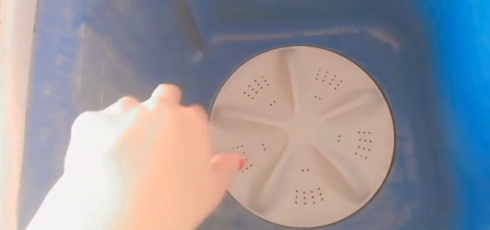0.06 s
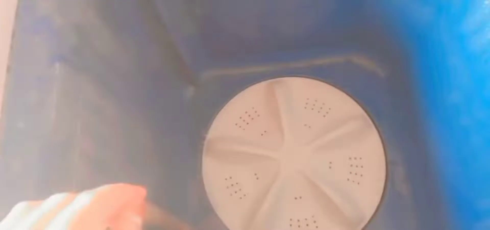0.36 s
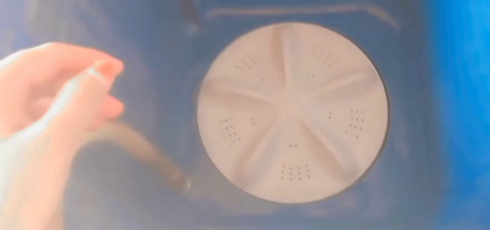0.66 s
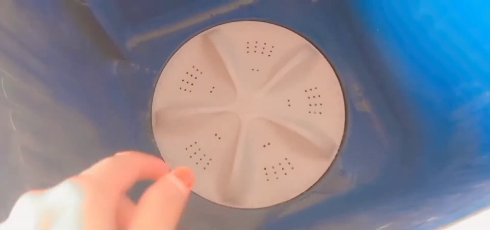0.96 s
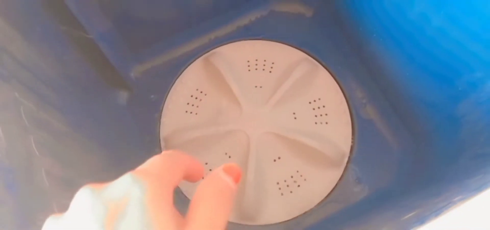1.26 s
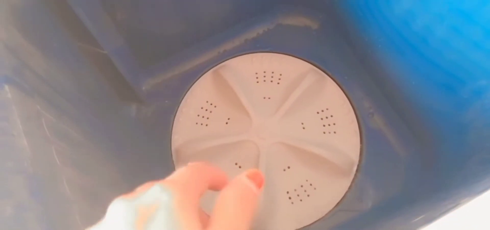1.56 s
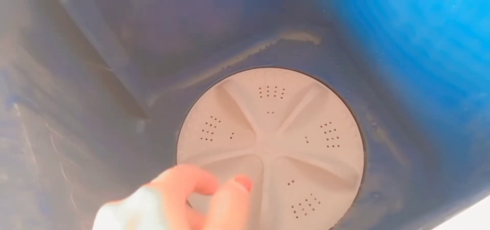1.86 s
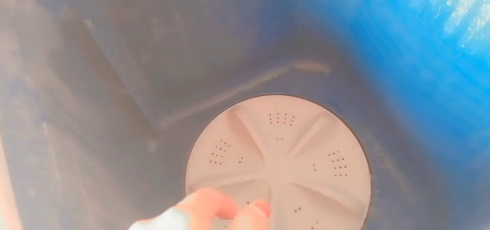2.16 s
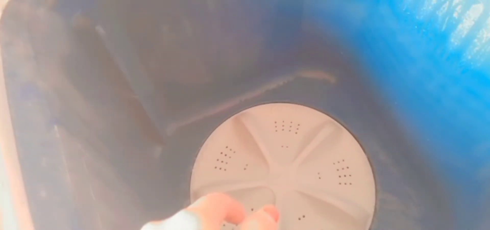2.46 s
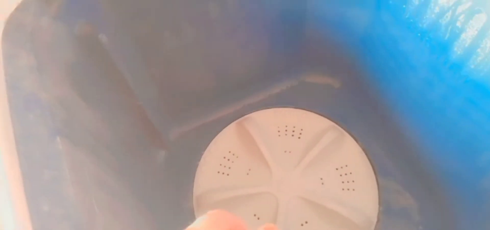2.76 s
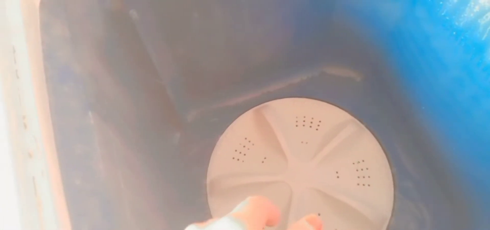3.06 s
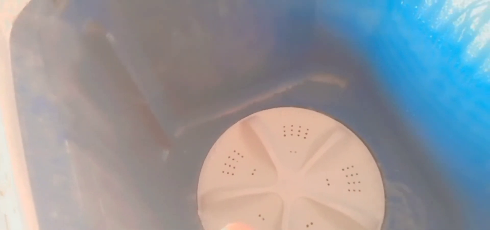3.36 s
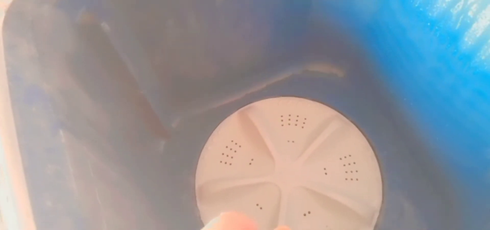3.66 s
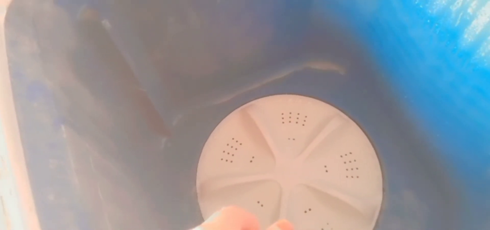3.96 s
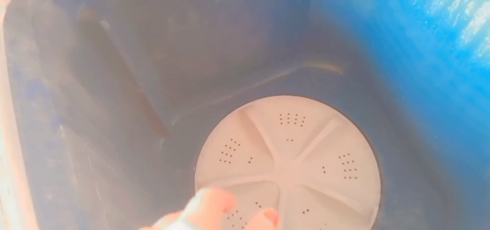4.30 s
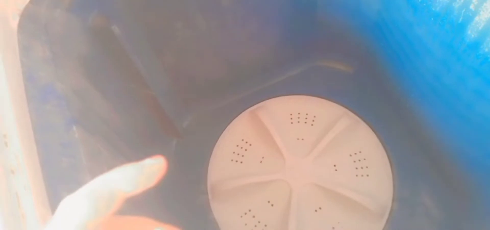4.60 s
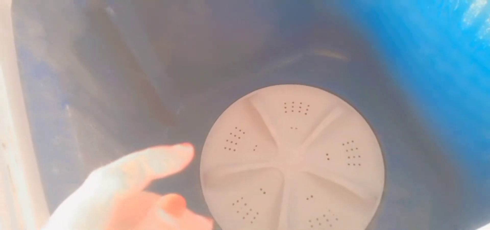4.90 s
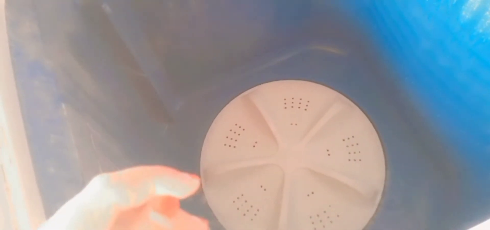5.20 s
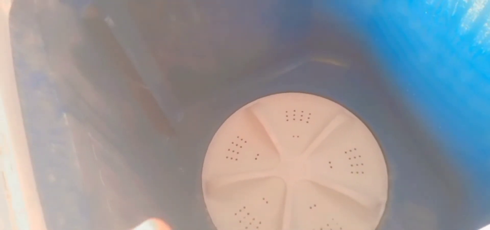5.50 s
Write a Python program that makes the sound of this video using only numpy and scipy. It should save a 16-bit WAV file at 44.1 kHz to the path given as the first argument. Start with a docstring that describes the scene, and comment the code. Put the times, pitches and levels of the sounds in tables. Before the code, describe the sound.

Water from a hose sputters, fizzes and splashes into an empty plastic washing machine tub over a low, hollow hum.

```python
"""Water sputters, fizzes and splashes over a low, hollow hum, with one knock about a second in.
A hose runs into the empty plastic tub of a washing machine, outdoors, heard from just above the rim.
The stream spatters on the bottom and traps ringing bubbles, larger ones as a puddle forms.
Its push keeps the air in the tub humming. The knock is the hose bumping the wall."""
import sys
import numpy as np
from scipy import signal
from scipy.fft import rfft, irfft
from scipy.io import wavfile
from scipy.ndimage import uniform_filter1d

SR = 44100
rng = np.random.default_rng(int(sys.argv[2]) if len(sys.argv) > 2 else 0)


def unload_audio(sound):
    """Save the sound as a 16-bit wav file, at the path given as the first command line argument."""
    columns = np.transpose(np.atleast_2d(sound))
    # keep every value between -1 and 1, then stretch to whole-number steps
    steps = np.round(np.clip(columns, -1, 1) * 32767)
    wavfile.write(sys.argv[1], SR, steps.astype(np.int16))


N = 244314
TIME = np.arange(N) / SR

# The tone of drops on plastic, of splashing and of fine spray. Each row: frequency in Hz, level in dB.
SPATTER_TONE = [(100, -71), (700, -77), (1500, -51), (2500, -7.5), (4000, -5.5), (5200, -17.5),
                (6500, -3.5), (7400, 4), (8100, -1.5), (8700, 8), (9500, -7.5), (12000, -29),
                (13700, -24.5), (16000, -19)]
SPLASH_TONE = [(450, -34), (750, -6), (1150, -9), (1600, -10.5), (2800, -2.5), (4300, 14), (5200, -2),
               (7400, 6.5), (16000, -37.5)]
SPRAY_TONE = [(1000, -59), (6000, -1.5), (12000, -1.5), (15800, -6.5)]
# The notes at which the tub's air and its plastic shell ring.
# Each row: pitch in Hz, level in dB, seconds to fade by 60 dB.
AIR_NOTES = [(281.3, 9, 0.85), (562, -9.5, 0.18)]
SHELL_NOTES = [(188.3, -0.5, 0.22), (297.7, 5, 0.29), (543, 5.5, 0.042), (788, 11, 0.017),
               (884, 7.5, 0.056), (961, 7.5, 0.091)]


def undb(db):
    """Turn decibels into a factor to multiply by."""
    return 10 ** (np.asarray(db) / 20)


def curve(rows):
    """Join rows of (seconds, value) with straight lines."""
    return np.interp(TIME, *np.transpose(rows))


def unit(x):
    """Scale a sound to an average power of 1."""
    return x / np.sqrt(np.mean(x ** 2))


def even(x, span_s):
    """Hold the power near 1 over each span: a steady supply of water, uneven only in its detail."""
    size = max(int(span_s * SR / 2), 2)
    power = uniform_filter1d(uniform_filter1d(x ** 2, size), size)
    return x / np.sqrt(np.abs(power) + 1e-4 * np.mean(x ** 2))


def fade(t, t60):
    """Die away by 60 dB each time t grows by t60."""
    return np.exp(-np.log(1000) * t / t60)


def flicker(per_s):
    """Wander at random around zero, heading for a new value per_s times a second."""
    targets = rng.standard_normal(1000)
    return unit(np.interp(TIME * per_s, np.arange(len(targets)), targets))


def add(out, s, sound):
    """Mix a short sound in, starting at s seconds."""
    start = int(np.clip(s * SR, 0, N - 1))
    out[start:start + len(sound)] += sound[:N - start]


def colour(x, tone, size=4096):
    """Filter a sound so that it takes on the tone given by rows of (Hz, dB)."""
    hz, db = np.transpose(tone)
    grid_hz = np.maximum(np.arange(size // 2 + 1) * SR / size, 1)
    gains = undb(np.interp(np.log(grid_hz), np.log(hz), db))
    # these steps make the filter ring only after a hit, never before it
    cepstrum = irfft(np.log(gains))
    cepstrum[1:size // 2] *= 2
    cepstrum[size // 2 + 1:] = 0
    response = irfft(np.exp(rfft(cepstrum)))
    return signal.fftconvolve(x, response / np.linalg.norm(response))[:N]


def resonate(x, notes):
    """A push makes an object ring at its own fading notes."""
    t = TIME[:SR // 2]
    ring = sum(undb(db) * fade(t, t60) * np.cos(2 * np.pi * hz * t) for hz, db, t60 in notes)
    return signal.fftconvolve(x, ring)[:N]


def impacts(per_s, scatter_db):
    """Clicks at random times, many small and a few large."""
    size = undb(scatter_db * np.minimum(rng.exponential(size=N), 5))
    return (rng.random(N) < per_s / SR) * size * np.sign(rng.standard_normal(N))


def ping(hz, cycles, rise):
    """A short note swells quickly, then climbs in pitch as it fades."""
    age = np.arange(int(cycles / hz * SR)) * hz / SR  # counted in cycles
    ring = np.sin(2 * np.pi * (age + rise * age ** 2 / (2 * cycles)))
    swell = 1 - np.exp(-(age / 2) ** 2)
    return ring * fade(age, cycles) * swell


def swarm(count, centre_hz, octaves, cycles, scatter_db, rise):
    """Many pings at random times, scattered around a pitch that may move."""
    out, centre = np.zeros(N), np.broadcast_to(centre_hz, N)
    for when, size, strength, life in rng.random((count, 4)):
        hz = centre[int(when * N)] * 2 ** (octaves * np.arcsin(2 * size - 1))
        gain = undb(-scatter_db * np.log(max(strength, .01)))
        add(out, when * N / SR, gain * ping(hz, cycles * (.5 + life), rise))
    return out


def walls(x, echo_db, t60=.06, pieces=30):
    """Close plastic walls throw the sound back; the echoes change as the stream wanders."""
    t = TIME[:SR // 8]
    hop = N // pieces
    out = x.copy()
    for start in range(0, N - hop, hop):
        piece = x[start:start + 2 * hop]
        echoes = rng.standard_normal(len(t)) * (rng.random(len(t)) < .08)
        echoes *= fade(t, t60) * (t > .0015)
        echoes /= np.linalg.norm(echoes)
        window = np.sin(np.pi * np.arange(len(piece)) / (2 * hop))
        add(out, start / SR, undb(echo_db) * signal.fftconvolve(piece * window, echoes))
    return out


def hollow(x, sharpness=24, spread_s=0.9, gain_db=0.41):
    """The tub lifts a few narrow bands of the splashing; which ones depends on where the stream lands."""
    # Each row: frequency in Hz, boost in dB, time in seconds when it is strongest.
    bands = [(2970, 3.5, 1.1), (4070, 8.5, 2.52), (3180, 3, 4.7), (5800, 9.5, 3.2), (7580, 5.5, 3.5),
             (9720, 3, 3.5), (13800, 5, 4.1), (2830, 4, 5.8)]
    out = x.copy()
    for hz, db, s in bands:
        nearness = np.exp(-((TIME - s) / spread_s) ** 2)
        band = signal.lfilter(*signal.iirpeak(hz, sharpness, fs=SR), x)
        out += (undb(db) - 1) * nearness * band
    return undb(gain_db) * out


def outdoors(level_db=-68):
    """The open air makes a faint, even hiss."""
    # The tone of the hiss. Each row: frequency in Hz, level in dB.
    air_tone = [(25, 5.5), (90, 0), (400, 1), (1000, -5), (3000, 5.5), (9000, -3), (16000, -9)]
    return undb(level_db) * unit(colour(rng.standard_normal(N), air_tone))


def hum(shell_db=-19):
    """The stream's soft, uneven push keeps the air in the tub sounding, and the shell faintly with it."""
    # How strongly the push makes the tub hum. Each row: time in seconds, level in dB.
    hum_levels = [(0, -57.5), (.5, -59.5), (.92, -64.5), (1.25, -62.5), (1.76, -59.5), (1.96, -72),
                  (2.11, -60), (2.3, -71.5), (2.52, -61.5), (2.61, -71.5), (2.7, -62), (2.8, -69.5),
                  (3.24, -67.5), (3.31, -61), (5.11, -59.5), (5.54, -66)]
    low_band = signal.butter(2, [170, 800], "band", fs=SR, output="sos")
    push = signal.sosfilt(low_band, rng.standard_normal(N))
    air = even(resonate(push, AIR_NOTES), span_s=0.13)
    shell = undb(shell_db) * unit(resonate(push, SHELL_NOTES))
    return (air + shell) * undb(curve(hum_levels))


def knock(boom_db=-39, air_db=-17, rattle_db=-45, contact_s=0.0029):
    """The hose bumps the wall: a dull boom, a brief plastic rattle, and the air in the tub rings on."""
    # The bump and its rebounds. Each row: start in seconds, dB added to the boom, dB added to the rattle.
    bumps = [(1.061, -3.5, 12.5), (1.075, -12, 10), (1.085, 8.5, -3), (1.114, -1, -3)]
    # The tone of rattling plastic. Each row: frequency in Hz, level in dB.
    rattle_tone = [(100, -33), (190, 7), (330, 14), (500, 1), (1000, -4.5), (1300, -11), (2700, -2.5),
                   (14000, -46)]
    blows, rattle = np.zeros((2, N))
    t = TIME[:SR // 5]
    push = np.exp(-t / contact_s)
    chatter = fade(t, .12) * (1 - push)
    for s, blow_db, chatter_db in bumps:
        add(blows, s, undb(blow_db + boom_db) * push / push.sum())
        add(rattle, s, undb(chatter_db + rattle_db) * chatter * rng.standard_normal(len(t)))
    # a thin wall gives off little sound below its lowest note
    bass_cut = signal.butter(4, 165, "high", fs=SR, output="sos")
    boom = signal.sosfilt(bass_cut, resonate(blows, SHELL_NOTES))
    return boom + undb(air_db) * resonate(blows, AIR_NOTES) + colour(rattle, rattle_tone)


def gurgles(spread_s=0.026, count=12):
    """A pocket of air is dragged under and breaks into a quick cluster of large, short-lived bubbles."""
    # Each row: start in seconds, level of each bubble in dB, typical pitch in Hz.
    air_pockets = [(2.49, -68, 450), (2.919, -51, 2060), (2.95, -70, 474), (3.031, -44.5, 2200),
                   (3.039, -65, 373), (3.27, -41.5, 2210), (3.47, -45.5, 2150), (3.719, -50.5, 1340),
                   (4.497, -55.5, 930), (4.62, -59, 1150)]
    out = np.zeros(N)
    for s, db, typical_hz in air_pockets:
        for when, size in rng.random((count, 2)):
            hz = typical_hz * 2 ** (.7 * (size - .5))
            add(out, s + when * spread_s, undb(db) * ping(hz, cycles=24, rise=.07))
    return walls(out, echo_db=-0.5)


def gushes(t60=0.084, spray_db=-6):
    """A lump of water lands all at once: a dense burst of splashing and spray that dies away."""
    # Each row: start in seconds, level in dB.
    landings = [(3.691, -38.5), (3.708, -42.5), (3.789, -38.5), (4.019, -44)]
    swell = np.zeros(N)
    for s, db in landings:
        add(swell, s, undb(db) * fade(TIME[:SR // 3], t60))
    splash, spray = swell * rng.standard_normal((2, N))
    return colour(splash, SPLASH_TONE) + undb(spray_db) * colour(spray, SPRAY_TONE)


def plips(splat_db=-5.5):
    """Single loud bubbles, each born in a soft splat, ring and climb in pitch as they near the surface."""
    # Each row: start in seconds, level in dB, pitch in Hz.
    loud_bubbles = [(0.189, -28, 3100), (0.4743, -24.5, 2950), (0.5358, -27, 2990), (0.606, -30, 3400),
                    (1.024, -29.5, 3980), (1.371, -28.5, 3560), (1.413, -28.5, 3950), (1.4588, -29.5, 3580),
                    (1.6981, -28, 4140), (1.931, -31.5, 3910), (2.0415, -28.5, 3410), (2.1141, -27.5, 3770),
                    (2.208, -33.5, 3760), (2.494, -31, 2820), (2.655, -41, 5250), (2.674, -28, 3880),
                    (2.872, -37.5, 3280), (3.0667, -28, 4070), (3.158, -42.5, 4900), (3.3334, -23.5, 3860),
                    (3.4069, -26, 3360), (3.494, -26, 2800), (3.509, -28, 3640), (3.788, -25.5, 3830),
                    (3.884, -33, 2540), (3.994, -30.5, 3900), (4.021, -23, 3070), (4.0604, -18.5, 3430),
                    (4.114, -30, 3950), (4.1737, -27, 3100), (4.4447, -28.5, 3320), (4.524, -31.5, 3300),
                    (4.88, -26.5, 2900), (5.2994, -32, 2830), (5.437, -30, 2590)]
    rings, splats = np.zeros((2, N))
    t = TIME[:SR // 40]
    burst = fade(t, 0.012) * (1 - np.exp(-t / 0.00071))
    for s, db, hz in loud_bubbles:
        add(rings, s, undb(db) * ping(hz, cycles=40.2, rise=0.042))
        add(splats, s, undb(db + splat_db) * burst * rng.standard_normal(len(t)))
    splat_band = signal.butter(3, [2500, 4700], "band", fs=SR, output="sos")
    return walls(rings + 2 * signal.sosfilt(splat_band, splats), echo_db=-2)


def drops(ring_hz=8050, ring_db=1, smack_db=-9, spray_db=-4):
    """Fat drops smack the plastic with a brief, shrill ring; at times the hose spits fine spray."""
    # Each row of both tables: start in seconds, level in dB.
    fat_drops = [(0.019, -33), (0.1153, -34), (0.258, -35), (0.492, -21), (0.651, -23.5), (0.716, -24),
                 (1.003, -23.5), (1.051, -26), (1.069, -20.5), (1.28, -36), (1.313, -25.5), (1.485, -12.5),
                 (1.6068, -25), (1.6742, -18.5), (1.699, -12.5), (2.281, -31.5), (2.7451, -23),
                 (3.229, -36), (3.535, -26), (3.558, -29.5), (3.612, -27.5), (3.761, -25), (3.7882, -22),
                 (3.795, -25.5), (3.903, -28), (3.948, -26), (3.966, -28.5), (4.06, -28), (4.1383, -23.5),
                 (4.2078, -21.5), (4.5378, -26), (4.6283, -28.5)]
    spits = [(0.017, -33), (0.1162, -31.5), (0.662, -38), (0.968, -28), (1.069, -22.5), (1.279, -34),
             (1.929, -29), (2.32, -31.5), (2.394, -36.5), (2.582, -32), (2.7458, -34), (4.209, -29.5),
             (4.465, -35), (4.564, -36), (4.722, -36), (4.788, -37)]
    smacks, sprays, rings = np.zeros((3, N))
    t = TIME[:SR // 30]
    burst = fade(t, .016) * (1 - np.exp(-t / .0009))
    for s, db in fat_drops:
        add(smacks, s, undb(db + smack_db) * burst * rng.standard_normal(len(t)))
        hz = ring_hz * (1 + 0.022 * rng.standard_normal())
        add(rings, s + .0005, undb(db + ring_db) * ping(hz, cycles=65, rise=0.012))
    puff = fade(t, .022) * (1 - np.exp(-(t / 0.0014) ** 2))
    for s, db in spits:
        add(sprays, s, undb(db + spray_db) * puff * rng.standard_normal(len(t)))
    sound = colour(smacks, SPATTER_TONE) + colour(sprays, SPRAY_TONE) + rings
    return walls(sound, echo_db=-4)


def flow(attack_s=0.0078, drain_t60=0.11, trickle_spatter_db=-8.5, trickle_fizz_db=-13):
    """Spurts on top of a trickle set the strength of the spatter and of the fizz over time."""
    # The thin stream that runs on between spurts. Each row: time in seconds, level in dB.
    trickle = [(0, -50.5), (.75, -46.5), (.86, -64), (1.16, -65), (1.45, -43.5), (1.75, -38.5), (1.87, -51),
               (2.12, -47), (2.85, -55), (3.2, -49.5), (3.4, -41), (4.22, -41), (4.59, -49), (5.0, -50),
               (5.53, -49.5)]
    # Each row: start in seconds, length in seconds, spatter level in dB, fizz level in dB.
    spurts = [(0.018, 0.035, -44.5, -51), (0.11, 0.075, -47, -54), (0.276, 0.035, -44.5, -58.5),
              (0.36, 0.071, -50, -56.5), (0.464, 0.18, -47.5, -61), (0.642, 0.1, -50.5, -51.5),
              (0.875, 0.11, -53, -63), (0.965, 0.13, -46, -52), (1.197, 0.055, -57, -52.5),
              (1.269, 0.12, -50, -52.5), (1.475, 0.067, -43, -51.5), (1.619, 0.012, -44, -49.5),
              (1.673, 0.08, -47.5, -46), (1.767, 0.048, -44.5, -72), (2.035, 0.12, -49, -50.5),
              (2.335, 0.0086, -62, -46.5), (2.39, 0.0082, -45.5, -44.5), (2.467, 0.079, -46.5, -52.5),
              (2.641, 0.09, -52.5, -57.5), (2.736, 0.066, -48.5, -61), (2.917, 0.072, -51.5, -61.5),
              (3, 0.085, -47.5, -70), (3.238, 0.1, -55, -48), (3.286, 0.17, -47.5, -52),
              (3.468, 0.064, -44.5, -44.5), (3.602, 0.071, -49, -71), (3.681, 0.16, -51.5, -49.5),
              (3.85, 0.073, -49, -50.5), (3.951, 0.12, -46, -46), (4.105, 0.059, -70, -50.5),
              (4.319, 0.13, -52.5, -48.5), (4.405, 0.094, -48, -47.5), (4.615, 0.052, -55, -51),
              (4.686, 0.058, -75, -51), (4.772, 0.024, -54, -46.5), (4.837, 0.087, -52, -46.5),
              (4.955, 0.1, -53.5, -44.5), (5.079, 0.081, -51, -48), (5.188, 0.094, -78, -50.5),
              (5.289, 0.17, -55.5, -47.5), (5.4, 0.15, -58.5, -51)]
    spatter_power = undb(curve(trickle) + trickle_spatter_db) ** 2
    fizz_power = undb(curve(trickle) + trickle_fizz_db) ** 2
    t = TIME[:SR // 2]
    for s, length_s, spatter_db, fizz_db in spurts:
        # a spurt starts abruptly, holds, then drains away
        shape = np.minimum(t / attack_s, 1) * fade(np.maximum(t - length_s, 0), drain_t60)
        add(spatter_power, s, (undb(spatter_db) * shape) ** 2)
        add(fizz_power, s, (undb(fizz_db) * shape) ** 2)
    return np.sqrt(spatter_power), np.sqrt(fizz_power)


def fizz(strength, splash_db=1):
    """Fine bubbles fizz where the stream lands; larger ones churn and splash as the puddle deepens."""
    # Bubble size changes with the water's depth. Each row: time in seconds, typical pitch in Hz.
    fizz_pitch = [(0, 3300), (1.0, 3340), (1.6, 3696), (2.4, 3270), (5.5, 3100)]
    # The puddle's churning. Each row: time in seconds, level in dB compared with the fine bubbles.
    churn_levels = [(0, -12), (.7, -17), (2.4, -21.5), (2.85, -8.5), (3.28, -11.5), (3.58, -13),
                    (3.78, -5.5), (4.15, -13.5), (4.38, -1.5), (4.85, -6.5), (5.02, 0), (5.45, -13.5)]
    pitch = curve(fizz_pitch) * (1 + 0.044 * flicker(per_s=25))
    fine = swarm(count=5600, centre_hz=pitch, octaves=0.31, cycles=30.4, scatter_db=5, rise=0.073)
    large = swarm(count=3200, centre_hz=1980, octaves=0.46, cycles=18, scatter_db=5.5, rise=0.021)
    splash = unit(colour(impacts(per_s=4500, scatter_db=11), SPLASH_TONE))
    churn = unit(large) + undb(splash_db) * splash
    fine = even(walls(fine, echo_db=8.5), span_s=0.11)
    churn = even(walls(churn, echo_db=15), span_s=0.062) * undb(curve(churn_levels))
    return (fine + churn) * strength


def spatter(strength, shrill_db=6, mist_db=-27, crackle_db=-6, mist_growth=0.7):
    """Droplets tick on the plastic with a brief, shrill ring near 8 kHz and throw off a crackling mist."""
    ticks = unit(colour(impacts(per_s=2000, scatter_db=10.5), SPATTER_TONE))
    pitch = 8150 + 150 * flicker(per_s=12)
    shrill = swarm(count=3000, centre_hz=pitch, octaves=0.075, cycles=115, scatter_db=8, rise=0.01)
    crackle = unit(colour(impacts(per_s=2200, scatter_db=0.5), SPRAY_TONE))
    sizzle = swarm(count=3000, centre_hz=12300, octaves=0.29, cycles=30, scatter_db=6, rise=0.04)
    droplets = even(walls(ticks + undb(shrill_db) * unit(shrill), echo_db=7), span_s=0.036)
    mist = unit(walls(undb(crackle_db) * crackle + unit(sizzle), echo_db=4.5))
    # the mist swells less than the droplets do
    return droplets * strength + mist * undb(mist_db) * strength ** mist_growth


def scene():
    """Mix all the sounds at the rim of the tub into one channel."""
    spatter_strength, fizz_strength = flow()
    stream = spatter(spatter_strength) + fizz(fizz_strength)
    water = hollow(stream + drops() + plips() + gurgles() + gushes())
    return (water + hum() + knock() + outdoors())[None]


def record(dry, top_hz=15800):
    """The recorder cuts off the highest treble."""
    return signal.sosfilt(signal.ellip(10, .2, 70, top_hz, fs=SR, output="sos"), dry)


dry = scene()
out = record(dry)
unload_audio(out)
```